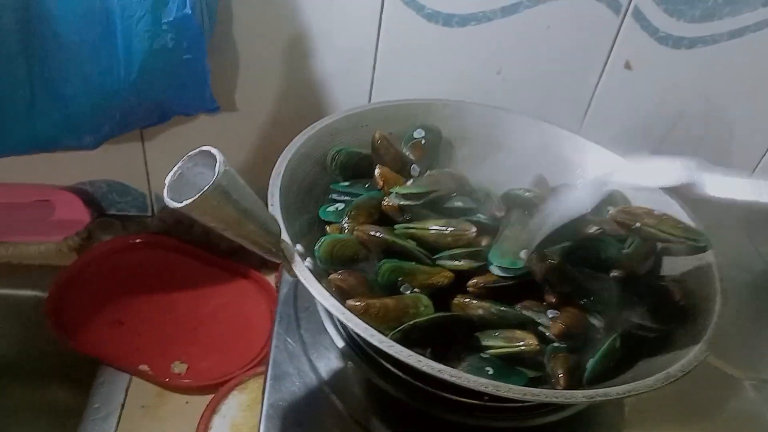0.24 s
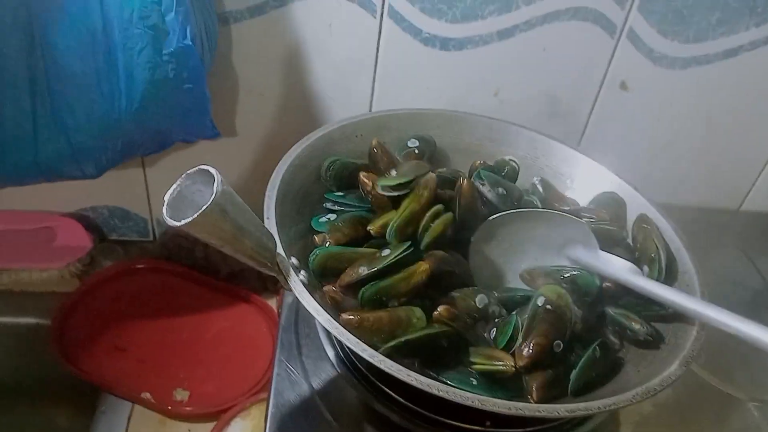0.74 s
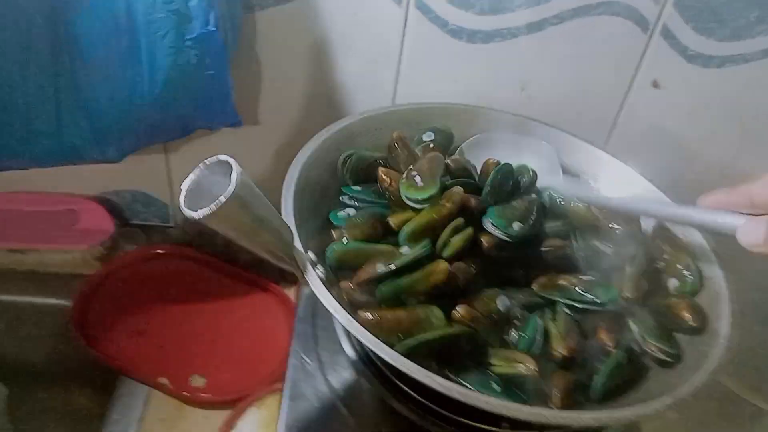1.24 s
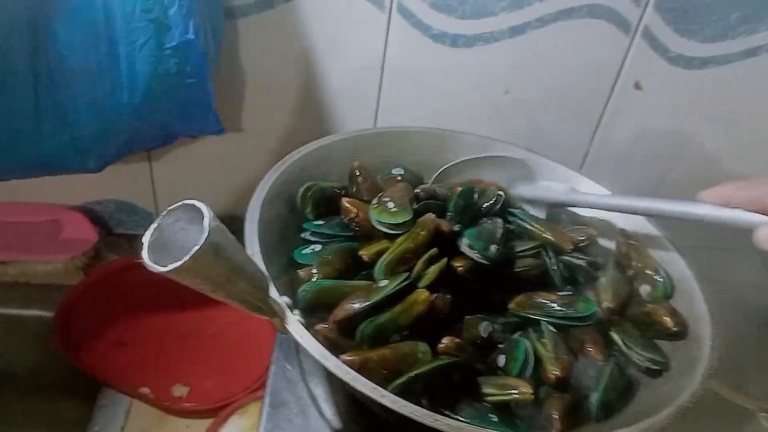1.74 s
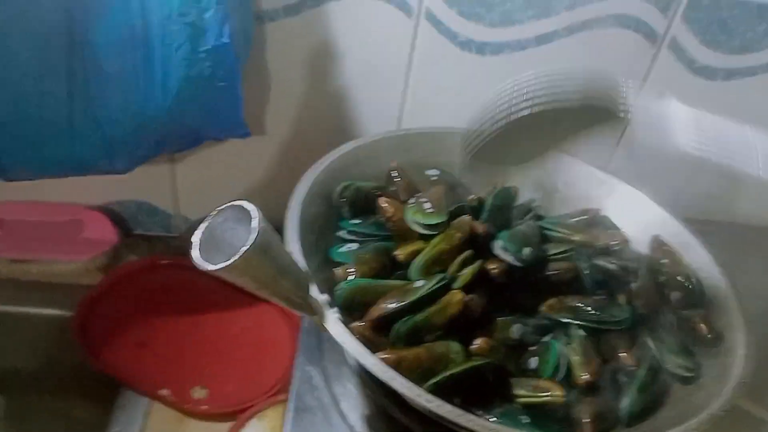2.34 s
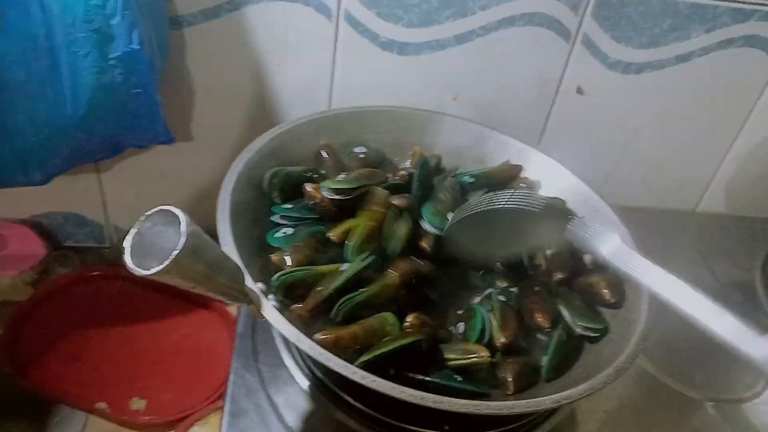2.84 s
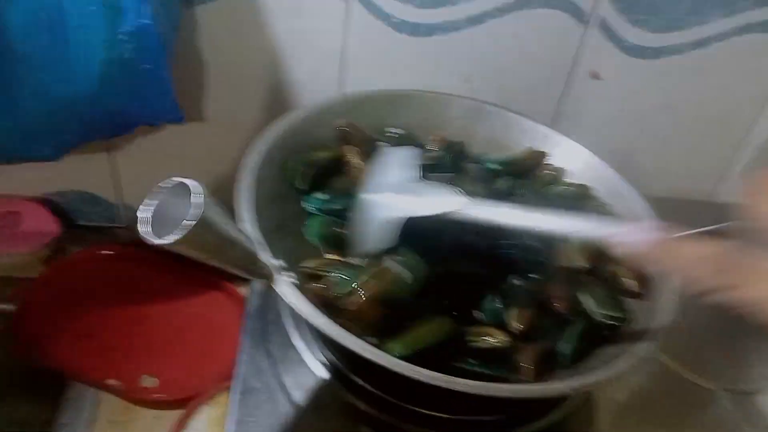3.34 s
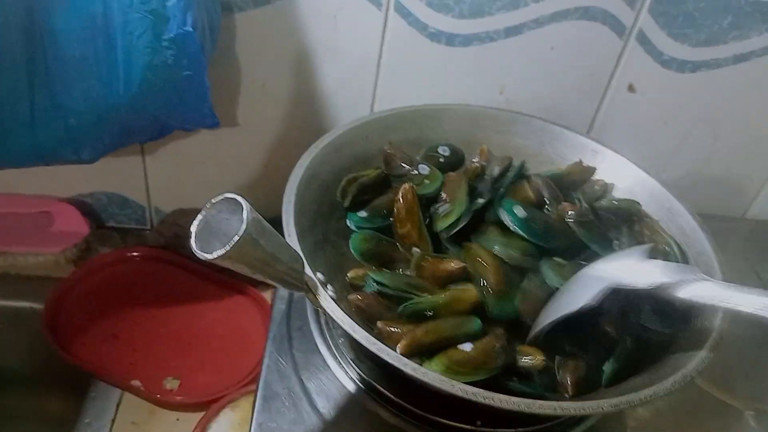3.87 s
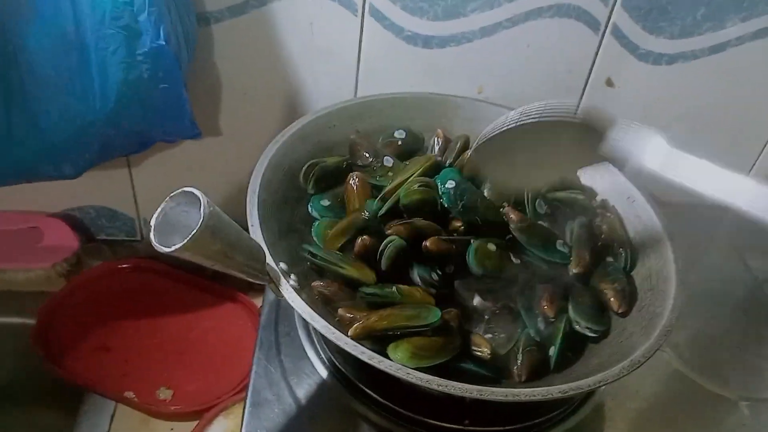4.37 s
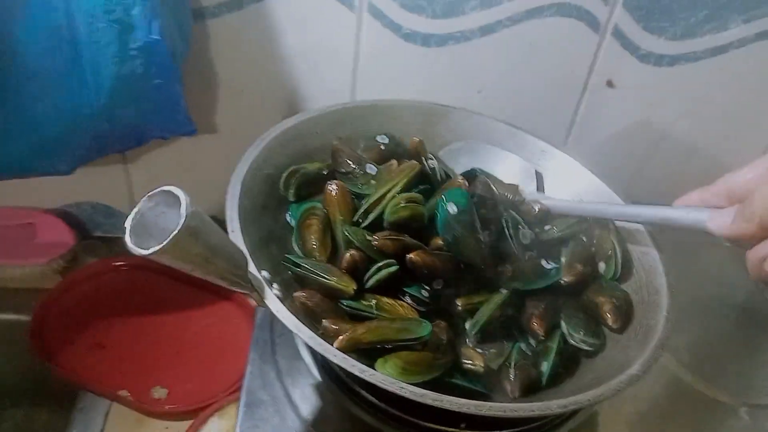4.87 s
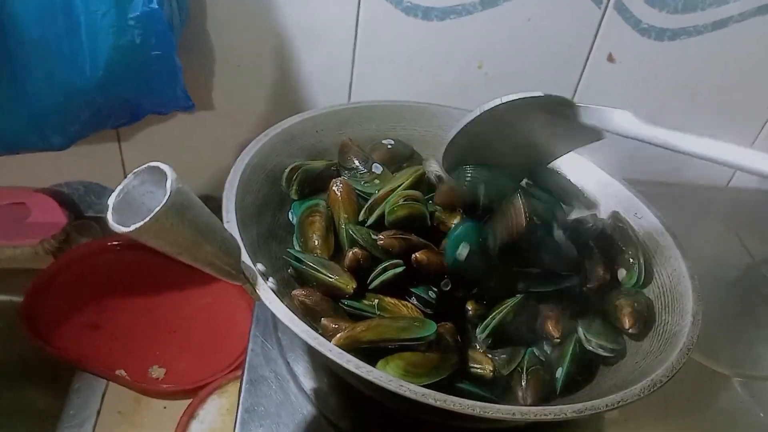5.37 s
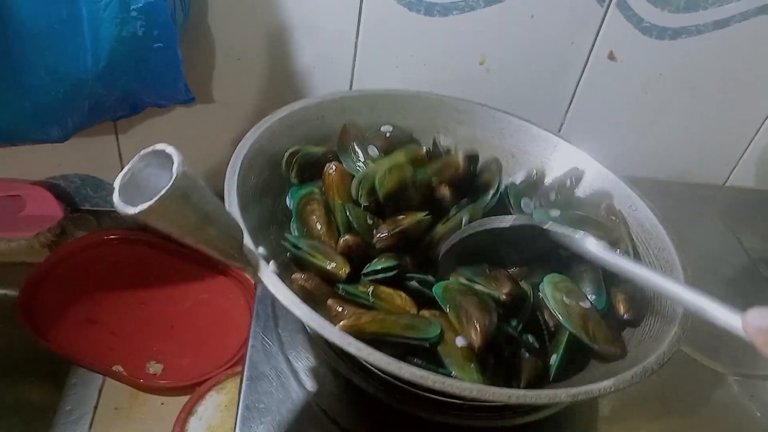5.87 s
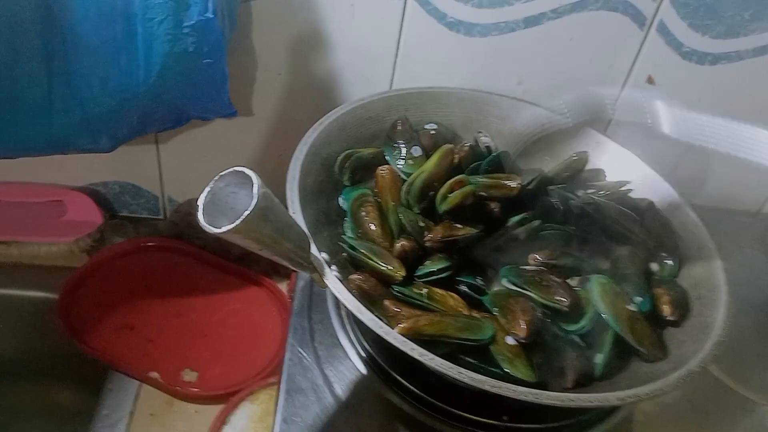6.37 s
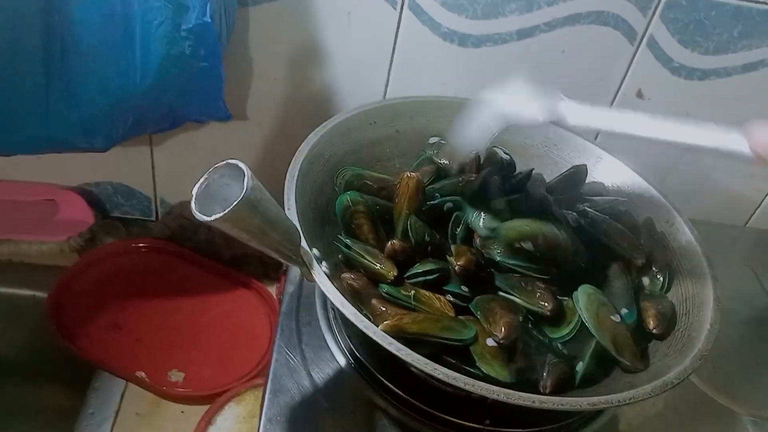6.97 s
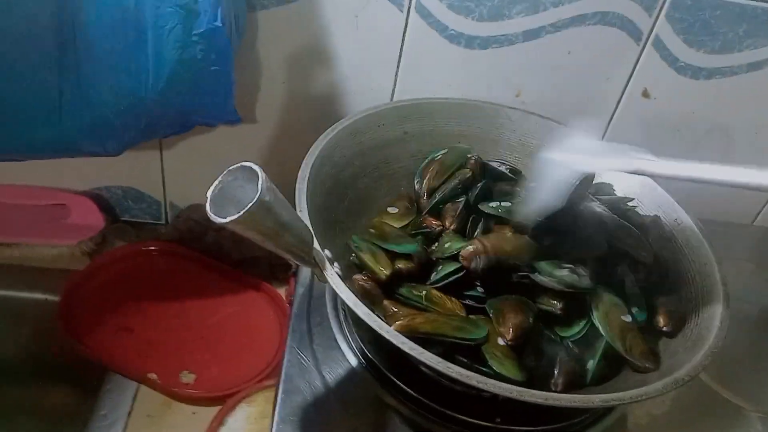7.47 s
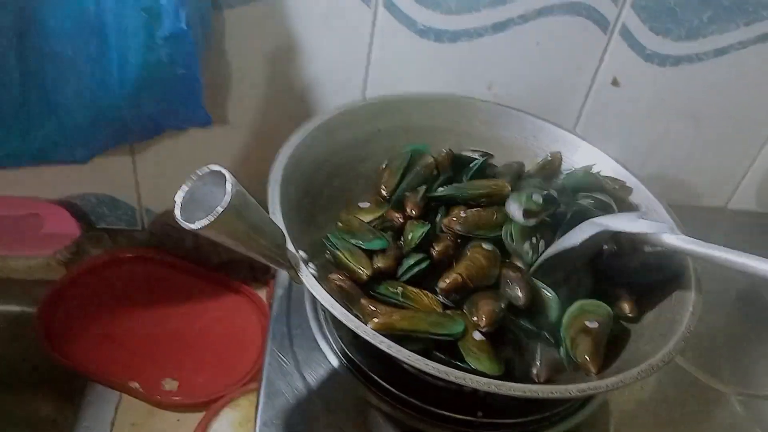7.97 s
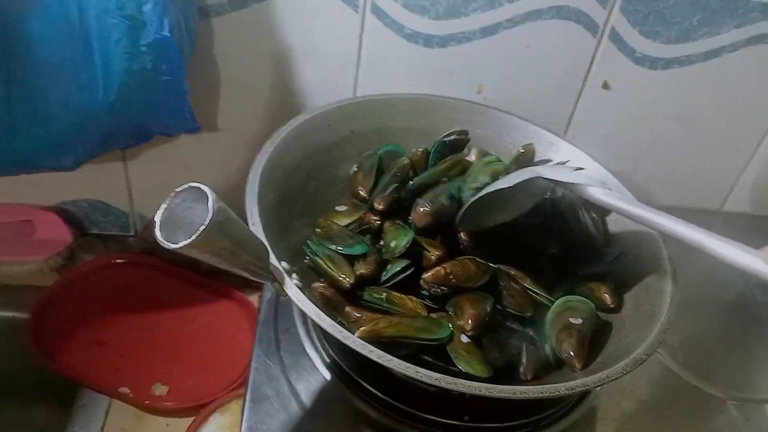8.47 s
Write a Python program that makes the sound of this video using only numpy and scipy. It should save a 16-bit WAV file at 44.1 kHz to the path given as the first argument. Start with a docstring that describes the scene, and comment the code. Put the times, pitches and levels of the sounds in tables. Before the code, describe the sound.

Steady wet frying hiss with ringing bubbles and crackling spray, slowly easing a little. Over it, short metallic ladle strokes, dry shell clatters and low damped booms from the wok, in irregular stirs. Sharp metal knocks stand out near the start and again around two and a half seconds. The hand-held microphone is close, in a tiled kitchen; the loudest hits are squashed.

```python
"""Mussels sizzle in a hot metal wok close to the microphone: noise and random clicks in bands, with ringing bubbles.
Juice spits on the metal as short bursts of bright noise; shells clack and rattle as decaying noise with a ring.
A ladle scrapes and shoves, exciting the damped low modes of the wok, which also bumps dully on its stand.
Three hard knocks ring the ladle; the recorder's limiter briefly ducks everything when the sound overloads it."""
import sys
import numpy as np
from scipy import signal
from scipy.fft import rfft, irfft, next_fast_len
from scipy.io import wavfile
from scipy.ndimage import uniform_filter1d, minimum_filter1d

SR = 44100
rng = np.random.default_rng(int(sys.argv[2]) if len(sys.argv) > 2 else 0)


def wav_record(signal):
    """Record a signal, one row per channel, as 16-bit PCM in the file named by sys.argv[1]."""
    frames = np.transpose(np.atleast_2d(signal))
    bounded = np.clip(frames, -1, 1)
    # unit amplitude maps onto the largest positive 16-bit level
    quanta = np.round(bounded * 32767).astype(np.int16)
    wavfile.write(sys.argv[1], SR, quanta)


N = 384111
TIME = np.arange(N) / SR   # s


def from_db(db):
    """Decibels to gain."""
    return 10 ** (np.asarray(db) / 20)


def rms_one(x):
    """Scale to unit power."""
    return x / np.sqrt(np.mean(x ** 2) + 1e-20)


def coloured(x, spectrum):
    """Filter x to a spectrum of (Hz, dB) points with skirts beyond both ends; rms 1."""
    hz, db = np.transpose(spectrum)
    size = next_fast_len(N + 4096)
    f = np.maximum(np.arange(size // 2 + 1) * SR / size, 1)
    low_skirt = 1 / (1 + (hz[0] / f / 2) ** 2)
    high_skirt = 1 / (1 + (f / hz[-1] / 2) ** 4)
    gain = from_db(np.interp(np.log(f), np.log(hz), db)) * low_skirt * high_skirt
    return rms_one(irfft(rfft(x, size) * gain, size)[:N])


def drift(per_s):
    """Slow random wandering with an rms of 1: low-passed noise made at a fortieth of the sample rate."""
    step = 40   # samples
    r = np.exp(-2 * np.pi * per_s * step / SR)
    noise = rng.standard_normal(N // step + 2002)
    slow = signal.lfilter([1], [1, -2 * r, r * r], noise)[2000:]   # skip the filter's start
    return np.interp(np.arange(N) / step, np.arange(len(slow)), rms_one(slow))


def pops(per_s, spread_db):
    """Random clicks, many small and few large; rms 1."""
    sizes = from_db(spread_db * np.minimum(rng.exponential(1, N), 6)) * rng.choice([-1, 1], N)
    return rms_one(sizes * (rng.random(N) < per_s / SR))


def ring(force, modes):
    """Damped modes (Hz, dB, t60 s) in parallel; a unit click starts each at its own level."""
    out = np.zeros(N)
    for k, (hz, db, t60) in enumerate(modes):
        r = np.exp(-np.log(1000) / (t60 * SR))
        w = 2 * np.pi * hz / SR
        mode = signal.lfilter([0, np.sin(w)], [1, -2 * r * np.cos(w), r * r], force + 1e-18)
        out += (-1) ** k * from_db(db) * mode
    return out


def resonance(x, hz, width_hz):
    """A band-pass with gain 1 on top."""
    r = np.exp(-np.pi * width_hz / SR)
    feedback = [1, -2 * r * np.cos(2 * np.pi * hz / SR), r * r]
    return signal.lfilter(np.array([1, 0, -1]) * (1 - r * r) / 2, feedback, x)


def decays(times, db, t60):
    """A sum of envelopes that jump up and die away."""
    out, age = np.zeros(N + SR), TIME[:SR // 2]
    for s, gain, life in np.broadcast(times, from_db(db), t60):
        i = max(int(s * SR), 0)
        out[i:i + len(age)] += gain * np.exp(-np.log(1000) * age / life)
    return out[:N]


def swells(rows, attack_s, release_s):
    """A sum of envelopes (start, length, height) that rise, hold and fall back."""
    total = 0
    for s, length, height in rows:
        rise = (TIME - s) / attack_s
        fall = 1 - (TIME - s - length) / release_s
        total = total + height * np.clip(np.minimum(rise, fall), 0, 1)
    return total


def add(out, s, sound):
    """Mix a short sound in at time s."""
    part = out[max(int(s * SR), 0):][:len(sound)]
    part += sound[:len(part)]


def reflected(x, wet_db, t60):
    """Dense early echoes from the bowl of the wok and the tiled corner: decaying noise as a response."""
    age = TIME[:SR // 3]
    echoes = rng.standard_normal(len(age)) * np.exp(-np.log(1000) * age / t60) * (age > .001)
    return x + from_db(wet_db) * signal.fftconvolve(x, echoes / np.linalg.norm(echoes))[:N]


def wandering_echoes(x, echo_db, sway_s):
    """Wok wall and tiles throw back near echoes whose delays shift as the hand-held microphone sways."""
    echoes = 0
    for delay_s in (.0019, .0031, .0047, .0074):
        heard_from = TIME - delay_s - sway_s * drift(0.58)
        echoes = echoes + np.interp(heard_from, TIME, x, left=0, right=0)
    return (x + from_db(echo_db) * echoes) / np.hypot(1, 2 * from_db(echo_db))


# The wok bumping on its stand. Each row: start in seconds, level in dB.
STAND_BUMPS = [(.905, -23), (3.597, -28), (3.735, -24), (4.051, -18.5), (4.199, -29), (4.711, -28),
               (5.139, -23.5), (5.541, -28), (6.377, -21.5), (7.32, -27), (7.681, -26), (8.631, -22)]
# Colour of a dull thud. Each row: frequency in Hz, relative density in dB per Hz.
THUD_COLOUR = [(35, -20), (55, -22), (90, -1.5), (170, -9), (400, -14), (900, -21), (2000, -26)]


def bumps():
    """Dull thuds of the loaded wok on its stand, as low noise that dies away."""
    s, db = np.transpose(STAND_BUMPS)
    return decays(s, db, t60=0.056) * coloured(rng.standard_normal(N), THUD_COLOUR)


# Body of the wok, also rung by scrapes and knocks. Each row: mode in Hz, relative level in dB, t60 in seconds.
WOK_MODES = [(104.4, -12, 0.16), (192.5, 1.5, 0.086), (234, 0, 0.075), (318.2, 0, 0.095),
             (339.4, 2.5, 0.082), (380.6, -6, 0.12), (418, -1.5, 0.079), (475, -2.5, 0.072),
             (490, -3, 0.14), (558, 2, 0.041), (571, 0, 0.11), (854, -10.5, 0.1), (990, -9, 0.094),
             (1220, 3.5, 0.032)]
# The ladle catching the wok; the spot favours lower or higher modes.
# Each row: start in seconds, relative level in dB, favoured frequency in Hz.
LADLE_SHOVES = [(0.906, -17, 250), (0.946, -25, 190), (1.192, -18.5, 420), (1.224, -18, 290),
                (3.016, -16.5, 304), (3.049, -26, 330), (3.099, -14.5, 257), (3.733, -20, 210),
                (3.892, -18.5, 250), (4.405, -31, 223), (4.6, -20, 330), (4.803, -11, 460),
                (4.884, -15.5, 450), (4.951, -16, 420), (6.438, -21, 350), (6.503, -23, 330)]


def shoves():
    """A blow followed by a brief judder makes the wok boom."""
    force, age = np.zeros(N), TIME[:SR // 5]
    for s, db, hz in LADLE_SHOVES:
        blow = 0.046 * rng.standard_normal(len(age)) * np.exp(-age / 0.013)
        blow[0] = 1
        add(force, s, from_db(db - 5.5) * resonance(blow, hz, hz * 0.53))
    return ring(force, WOK_MODES)


# Hard knocks of the ladle. Each row: start in seconds, force in dB, lowest frequency in Hz the contact excites.
HARD_KNOCKS = [(0.222, 9.5, 514), (0.4289, 5, 1890), (2.4052, 6.5, 546)]
# Body of the ladle. Each row: mode in Hz, relative level in dB, t60 in seconds.
LADLE_MODES = [(840, -7, 0.024), (1000, 2, 0.0093), (1266, 0, 0.013), (1700, -7.5, 0.017),
               (1980, -1, 0.0086), (2330, -8.5, 0.011), (2670, -9, 0.011), (3000, -8.5, 0.012),
               (4460, -13.5, 0.0071)]


def knocks():
    """The ladle hits hard, rings in short modes damped at once by the food, and faintly rings the wok."""
    force = np.zeros(N)
    for s, db, low_hz in HARD_KNOCKS:
        blow = np.zeros(SR // 20)
        blow[0] = 1
        contact = signal.butter(2, low_hz, "high", fs=SR, output="sos")
        add(force, s, from_db(db) * signal.sosfilt(contact, blow))
    return reflected(ring(force, LADLE_MODES), wet_db=-4, t60=0.13) + from_db(-35) * ring(force, WOK_MODES)


# Strokes of the ladle along the wok. Each row: start in seconds, length in seconds, force in dB.
LADLE_STROKES = [(0.156, 0.11, -28.5), (0.335, .12, -34.5), (0.892, 0.2, -35.5), (1.18, 0.056, -27),
                 (1.39, 0.027, -35.5), (1.654, 0.034, -38), (2.315, 0.14, -30), (2.48, .15, -30),
                 (2.684, 0.14, -38), (2.988, .28, -34.5), (3.603, 0.045, -36), (3.72, 0.26, -33),
                 (4.172, 0.027, -31.5), (4.371, 0.037, -23), (4.47, .26, -33), (4.811, 0.15, -28),
                 (5.524, .36, -31.5), (6.454, 0.11, -30), (7.323, 0.13, -42), (7.65, 0.039, -30.5),
                 (8.107, 0.11, -37.5), (8.4, 0.029, -40), (8.618, 0.072, -38.5)]
STROKE_ATTACK_S, STROKE_RELEASE_S = 0.016, 0.057   # the ladle bites fast and eases off
JUDDER_DB, JUDDER_PER_S = 2, 19   # the grip of the ladle is uneven
SHIFTING_DB = -46.5   # between strokes the heap of shells shifts on the metal


def stirring():
    """Force of the ladle: strokes over the faint shifting of the heap, with an uneven grip."""
    rows = [(s, length, from_db(db)) for s, length, db in LADLE_STROKES]
    strokes = swells(rows, STROKE_ATTACK_S, STROKE_RELEASE_S)
    return np.hypot(strokes, from_db(SHIFTING_DB)) * from_db(JUDDER_DB * drift(JUDDER_PER_S))


# Colour of shells rubbing on each other. Each row: frequency in Hz, relative density in dB per Hz.
RUBBING_COLOUR = [(450, -21), (800, -3.5), (1100, -3), (1700, 2), (2800, -2), (4500, -6), (6000, -16),
                  (9000, -26)]
RUBBING_DB = -5   # relative to the force of the stroke


def scrape():
    """The ladle sticks and slips on the wok, sets its modes droning and drags the shells along."""
    slips, force = pops(per_s=500, spread_db=3.0), stirring()
    drone = ring(slips * force, WOK_MODES) / np.std(ring(slips, WOK_MODES))
    rubbing = coloured(pops(per_s=700, spread_db=4.5), RUBBING_COLOUR)
    return drone + rubbing * force * from_db(RUBBING_DB)


def shell_rings(s, db, ring_hz, t60):
    """Every clack rings at the pitch of its shell, with one overtone, fed by the rattle that follows."""
    out, age = np.zeros(N), TIME[:SR // 4]
    for start, level_db, hz, life in zip(s, db, ring_hz, t60):
        contacts = 0.2 * rng.standard_normal(len(age)) * np.exp(-np.log(1000) * age / life)
        contacts[0] = 1
        tone = resonance(contacts, hz, 140) + from_db(-18.0) * resonance(contacts, hz * 1.53, 180)
        add(out, start, from_db(level_db + 30.5) * tone)
    return out


# Shells struck by the ladle or falling. Each row: start in seconds, relative rattle level in dB,
# first crack in dB, ring in Hz, treble in dB relative to the body.
SHELL_CLACKS = [(.124,-15,-16,1850,-11),(.161,-12.5,-21,1900,-13),(.189,-14.5,-26,1780,-14),(.543,-15,-24,1730,-18),(.903,-21,-16,5460,3),(.942,-12.5,-16,3320,-3),(1.39,-12,-16,1960,-16),(1.581,-14.5,-25,2190,-8),(1.91,-19,-15,2150,-12),(2.271,-17,-10,3160,-14),(2.357,-18,-26,2800,-18),(2.37,-18,-9,2930,-16),(2.997,-16.5,-24,2740,-1),(3.595,-14,-7,3290,0),(3.67,-14.5,-18,2330,-17),(3.695,-13.5,-24,1810,-16),(3.881,-23,-26,1700,-2),(4.052,-21,-22,2200,9),(4.2,-32,-24,4000,8),(4.364,-20,-25,2170,-3),(4.399,-15,-13,1610,-1),(4.406,-22,-28,5100,-6),(4.532,-11,-21,2220,-22),(4.807,-17.5,-18,970,-12),(4.938,-24,-26,1810,6),(5.136,-19,-30,2300,-5),(5.254,-16.5,-17,2970,-14),(5.299,-24,-19,2970,-4),(5.318,-20,-28,3000,-12),(5.361,-18,-11,2810,-24),(5.39,-19,-13,2700,-23),(5.474,-17.5,-21,2800,-5),(5.517,-14.5,-22,1190,-13),(5.539,-11,-10,2700,-6),(5.557,-17,-21,1250,-10),(5.574,-25,-15,1330,-1),(5.657,-41,-27,2200,11),(6.002,-17.5,-26,2070,-8),(6.13,-18,-29,1980,-8),(6.377,-16.5,-10,3900,0.5),(6.438,-24,-17,3700,1.5),(7.305,-22,-22,880,-14),(7.345,-14.5,-16,1590,-14),(7.559,-23,-13.5,5900,3),(7.678,-14,-12,2350,-2),(8.271,-22,-21,2100,-2),(8.351,-18.5,-30,2140,-13),(8.627,-16.5,-10.5,4570,3)]
# Colour of a clack's body. Each row: frequency in Hz, relative density in dB per Hz.
SHELL_BODY = [(350, -19), (700, -1), (1100, 6.5), (1700, 5.5), (2400, 7), (3200, 8.5), (3800, 0.5),
              (4500, 0.5), (6000, -20), (9000, -41)]
# Colour of its bright edge. Each row: frequency in Hz, relative density in dB per Hz.
SHELL_TREBLE = [(2500, -15), (4300, 16.5), (5500, 2), (7000, -26), (8500, 8), (9700, 11), (11200, 12.5),
                (12300, -10), (15800, -39.5)]
# a harder blow rattles longer: base t60 at the usual strength, and the rise that doubles it
RATTLE_T60_S, USUAL_CLACK_DB, RATTLE_DOUBLES_DB = 0.078, -21, 11
CRACK_T60_S = .022


def shells():
    """Each clack is a short crack and a rattle of neighbours; small ticks come at random in between."""
    when, size, pitch, shine = rng.random((70, 4)).T
    ticks = np.c_[when * N / SR, -32 + 8 * size, -27 + 9 * size, 1500 + 3000 * pitch, -10 + 13 * shine]
    s, db, crack_db, ring_hz, treble_db = np.vstack([SHELL_CLACKS, ticks]).T
    t60 = RATTLE_T60_S * 2 ** ((db - USUAL_CLACK_DB) / RATTLE_DOUBLES_DB)
    body_crack = decays(s, crack_db, CRACK_T60_S)
    body_rattle = decays(s, db - 7, t60 * 1.3)   # the body outlasts the edge
    edge_crack = decays(s, crack_db + treble_db - 2.5, CRACK_T60_S)
    edge_rattle = decays(s, db + treble_db - 7.0, t60)
    body = np.hypot(body_crack, body_rattle) * coloured(rng.standard_normal(N), SHELL_BODY)
    edge = np.hypot(edge_crack, edge_rattle) * coloured(rng.standard_normal(N), SHELL_TREBLE)
    return body + edge + shell_rings(s, db, ring_hz, t60)


# Turned shells spill juice on bare metal. Each row: start in seconds, length in seconds, rise of the spray in dB.
JUICE_SPILLS = [(.5, 0.23, 2.5), (1.5, .6, 1.5), (3.75, 0.86, 1.5), (5.5, 0.75, 2.5)]


def spill_flare_db():
    """Rise of the spray in dB as spilt juice flares up and boils off."""
    return swells(JUICE_SPILLS, attack_s=0.12, release_s=0.16)


# Colour of a spitting drop. Each row: frequency in Hz, relative density in dB per Hz.
SPIT_COLOUR = [(2500, -22), (4500, -12), (7000, -7), (9000, -9), (10400, 5), (12500, -6), (15800, -2)]
SPIT_DB, SPIT_SPREAD_DB, SPIT_T60_S = -28, 11.5, 0.017   # weakest drop, range up to the strongest, decay
SPIT_FOLLOWS = 1.4   # dB of spitting per dB of flare


def spits():
    """Now and then a drop of juice hits bare metal and spits, harder while a spill flares."""
    when, size = rng.random((170, 2)).T
    envelope = decays(when * N / SR, SPIT_DB + SPIT_SPREAD_DB * size ** 2, SPIT_T60_S)
    return envelope * from_db(SPIT_FOLLOWS * spill_flare_db()) * coloured(rng.standard_normal(N), SPIT_COLOUR)


def frying(spectrum, per_s, spread_db, hiss_db, flutter_db):
    """Bursting droplets over a smooth hiss of steam, coming in small flurries."""
    burst = pops(per_s, spread_db) + from_db(hiss_db) * rng.standard_normal(N)
    return coloured(burst * from_db(flutter_db * drift(14.2)), spectrum)


def bubbles(low_hz, high_hz, per_s, spread_db, cycles, count=36):
    """Bubbles ring briefly in the hollows of the shells, each hollow at its own pitch; rms 1."""
    clicks, hollow = pops(per_s, spread_db), rng.integers(0, count, N)
    pitches = np.geomspace(low_hz, high_hz, count) * (1 + 0.018 * rng.standard_normal(count))
    total = 0
    for k, hz in enumerate(pitches):
        total = total + ring(clicks * (hollow == k), [(hz, 0, cycles / hz)])   # t60 lasts this many cycles
    return rms_one(total)


# The simmering wok and burner singing softly. Each row: mode in Hz, relative level in dB, t60 in seconds.
DRONE_MODES = [(103.5, -14.5, 0.21), (180, -20, 0.055), (337, -16, 0.21), (576, -0.5, 0.15),
               (768, -2, 0.093), (1018, 5, 0.051), (1361, -0.5, 0.21), (1665, 1.5, 0.15)]
DRONE_DB = -36
# Colour of the bubbling. Each row: frequency in Hz, relative density in dB per Hz.
BUBBLING_COLOUR = [(55, -42), (85, -37), (200, -15), (450, -12), (700, -16), (850, -4), (1050, -4.5),
                   (1350, 3), (1480, -1.5), (1650, 3.5), (1850, -0.5), (2300, -30.5)]
# Colour of the frying. Each row: frequency in Hz, relative density in dB per Hz.
FRYING_COLOUR = [(1400, -17), (1750, 0.5), (2200, 3.5), (2500, -0.5), (3200, -1.5), (3700, -5.5),
                 (4400, -4.5), (5100, -11.5), (6000, -25), (7500, -21.5), (9500, -76)]
# Colour of the spray. Each row: frequency in Hz, relative density in dB per Hz.
SPRAY_COLOUR = [(5500, -15), (7500, -16.5), (8500, -11), (9500, -6.5), (10350, 0), (11300, -7),
                (12000, -11), (13000, -15.5), (14000, -10.5), (15800, -10)]
# Heat of the wok, which drives the level of the frying. Each row: time in seconds, relative level in dB.
WOK_HEAT = [(0, -20), (.4, -22.5), (.9, -19.5), (1.35, -20.5), (1.9, -19.5), (2.6, -20.5), (4.2, -21),
            (5.4, -22), (6.6, -22.5), (7.1, -22.5), (8.7, -23)]
# bubbling and spray follow the heat: band gain in dB at the usual heat, and dB per dB of heat
USUAL_HEAT_DB = -22
BUBBLING_DB, BUBBLING_FOLLOWS = -30.1, 1.12
SPRAY_DB, SPRAY_FOLLOWS = -29.05, 1


def sizzle():
    """Large bubbles are few and low, spray is dense and bright; near echoes and a soft drone surround them."""
    heat_s, heat_levels = np.transpose(WOK_HEAT)
    heat_db = np.interp(TIME, heat_s, heat_levels)
    hotter_db = heat_db - USUAL_HEAT_DB
    bubbling_db = BUBBLING_DB + BUBBLING_FOLLOWS * hotter_db
    spray_db = SPRAY_DB + SPRAY_FOLLOWS * hotter_db + spill_flare_db()

    low = frying(BUBBLING_COLOUR, per_s=1500, spread_db=1.5, hiss_db=-3.0, flutter_db=1.5)
    low += from_db(-7.5) * bubbles(974.4, 1864, per_s=250, spread_db=3.5, cycles=93)
    middle = frying(FRYING_COLOUR, per_s=4300, spread_db=2.0, hiss_db=1, flutter_db=1.04)
    middle += from_db(-12.5) * bubbles(1863, 3515, per_s=300, spread_db=4.0, cycles=62)
    high = frying(SPRAY_COLOUR, per_s=3500, spread_db=3.0, hiss_db=5.5, flutter_db=1.07)

    juice = from_db(bubbling_db) * low + from_db(heat_db - 2.03) * middle + from_db(spray_db) * high
    drone = from_db(DRONE_DB) * rms_one(ring(rng.standard_normal(N), DRONE_MODES))
    return wandering_echoes(juice, echo_db=-18.0, sway_s=.00008) + drone


def scene():
    """Everything comes from the wok and is the same in both channels; the deepest bass does not radiate."""
    wok = bumps() + shoves() + knocks() + scrape() + shells() + spits() + sizzle()
    wok = signal.sosfilt(signal.butter(4, 50, "high", fs=SR, output="sos"), wok)
    return np.array([wok, wok])


RMS_LIMIT, CEILING = 0.4, 1   # the limiter acts above this rms; soft ceiling of the peaks (full scale 1)
LOOK_AHEAD_S, HOLD_S, RELEASE_DB_PER_S = .022, 0.011, 98
CUTOFF_HZ = 15850


def record(dry):
    """A look-ahead limiter fades down before each overload, holds and recovers; peaks round, the top is cut."""
    power = uniform_filter1d(dry[0] ** 2, SR // 400)
    over_db = 10 * np.log10(np.maximum(power / RMS_LIMIT ** 2, 1))
    ahead, hold = int(LOOK_AHEAD_S * SR), int(HOLD_S * SR)
    held = -minimum_filter1d(-over_db, ahead + hold, origin=(hold - ahead) // 2)   # running maximum
    recovery_db = RELEASE_DB_PER_S * TIME
    released = np.maximum.accumulate(held + recovery_db) - recovery_db   # falls no faster than the release
    limited = dry * from_db(-uniform_filter1d(released, int(0.011 * SR)))
    rounded = limited / (1 + (limited / CEILING) ** 6) ** (1 / 6)
    return signal.sosfilt(signal.ellip(12, .1, 80, CUTOFF_HZ, fs=SR, output="sos"), rounded)


dry = scene()
out = record(dry)
wav_record(out)
```